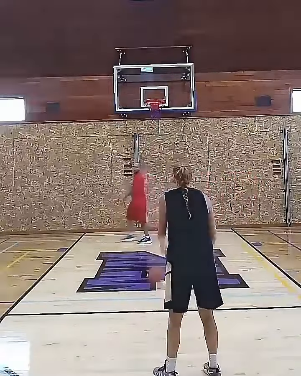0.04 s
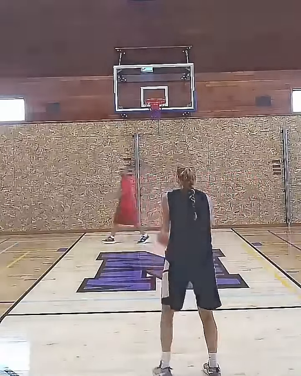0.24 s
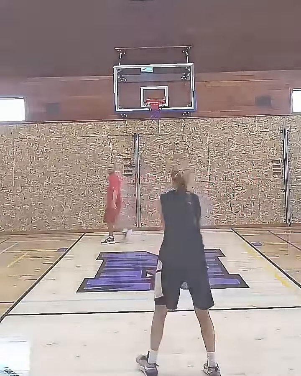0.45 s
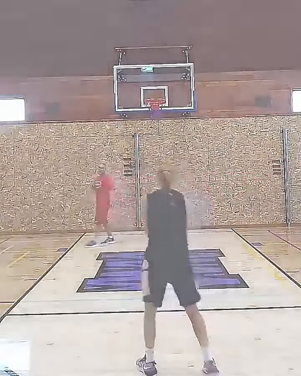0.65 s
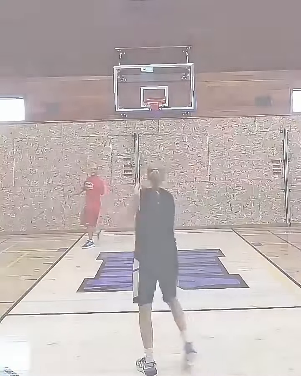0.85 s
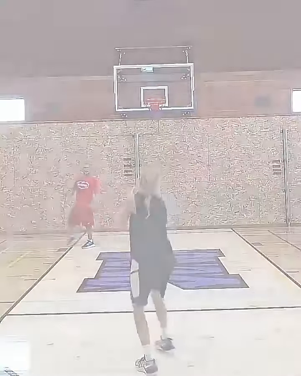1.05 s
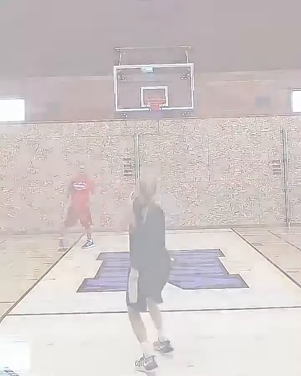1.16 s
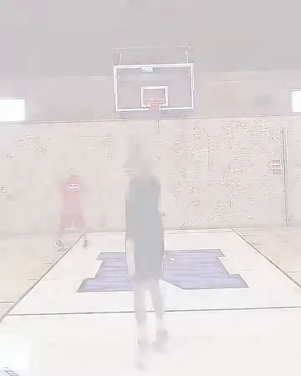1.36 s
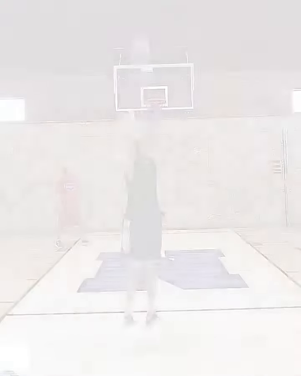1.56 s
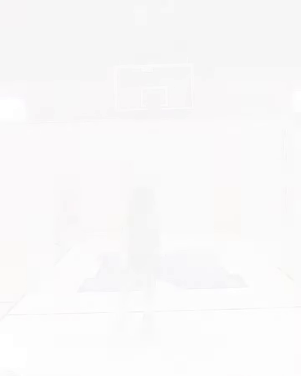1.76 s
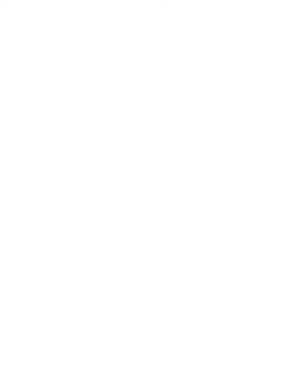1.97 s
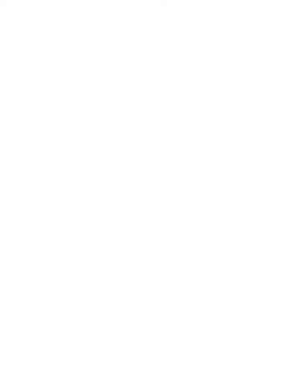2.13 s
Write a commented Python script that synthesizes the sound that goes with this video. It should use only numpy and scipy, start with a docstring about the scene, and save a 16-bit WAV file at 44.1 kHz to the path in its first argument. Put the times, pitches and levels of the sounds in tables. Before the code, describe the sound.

One loud basketball bounce rings out in a big, echoing gym. As it fades, light scuffs and a squeaky step lead to a faint rasp of fingers on the ball, then a sharp two-footed landing on the boards.

```python
"""One bounce and a jump shot in a gym

A basketball slaps and thumps once on the wooden floor of a large gym, and the hall booms on.
Soles scuff, click and squeak as the player steps in and jumps; the ball rasps off the fingers,
both feet land, and the sound cuts off. One microphone hears each impact directly, then from the
hall, over the dying echo of earlier play and a low room noise."""
import sys
import numpy as np
from scipy import signal
from scipy.fft import rfft, irfft
from scipy.io import wavfile
from scipy.ndimage import uniform_filter1d

SR = 44100
rng = np.random.default_rng(int(sys.argv[2]) if len(sys.argv) > 2 else 0)


def digitize_waveform(pressure):
    """Quantize a signal to 16-bit integers and store it at the path in sys.argv[1].

    Rows of a 2-D input are taken as channels; values are limited to [-1, 1].
    """
    field = np.atleast_2d(pressure).T
    bounded = np.clip(field, -1, 1)
    quanta = np.round(bounded * 32767).astype(np.int16)
    wavfile.write(sys.argv[1], SR, quanta)


N = 97020
TIME_S, BIN_HZ = np.arange(N) / SR, np.arange(N // 2 + 1) * SR / N


def undb(db):
    """Decibels to gain."""
    return 10 ** (np.asarray(db) / 20)


def curve(points):
    """Join (Hz, value) points across the spectrum on a log-frequency axis."""
    hz, values = np.array(points, float).T
    return np.interp(np.log(BIN_HZ + 1e-9), np.log(hz), values)


def convolve(x, response):
    """Pass a sound through a response."""
    return signal.fftconvolve(x, response)[:N]


def unit(x):
    """Scale to unit energy."""
    return x / np.sqrt(np.sum(x ** 2))


def delay(x, seconds):
    """The same sound, later."""
    return np.concatenate([np.zeros(int(seconds * SR)), x])[:N]


def soften(x, edge_hz):
    """Roll off the treble."""
    return signal.sosfilt(signal.butter(2, edge_hz, fs=SR, output="sos"), x)


def click(spectrum):
    """A sharp minimum-phase pulse with the given spectrum and a peak of 1."""
    cepstrum = irfft(np.log(undb(curve(spectrum))), N)
    cepstrum[1:N // 2] *= 2
    cepstrum[N // 2 + 1:] = 0
    pulse = irfft(np.exp(rfft(cepstrum)), N)
    return pulse / np.abs(pulse).max()


def noise(spectrum):
    """Coloured noise of rms 1."""
    x = irfft(rfft(rng.standard_normal(N)) * undb(curve(spectrum)), N)
    return x / x.std()


def decay(t60_s):
    """A fade of 60 dB every t60_s seconds."""
    return np.exp(-np.log(1000) * TIME_S / t60_s)


def ring(hz, t60_s, rise_s=1e-6):
    """A damped mode that swells over its rise time."""
    return np.sin(2 * np.pi * hz * TIME_S) * decay(t60_s) * (1 - np.exp(-TIME_S / rise_s))


def swell(start_s, length_s):
    """A short half-sine envelope."""
    return np.sin(np.pi * np.clip((TIME_S - start_s) / length_s, 0, 1))


# How long the gym rings. Each row: frequency in Hz, seconds to fall 60 dB.
HALL_DECAY = [(60, 1.7), (120, 1.4), (250, 1.656), (550, 2.84), (1400, 2.81), (2700, 2.24), (4500, 2.19),
              (8000, 1.4), (15000, 1.2)]

def die_away(x):
    """Each band of a sound fades at the hall's own rate."""
    spectrum, faded = rfft(x), 0
    centres = [hz for hz, _ in HALL_DECAY]
    for share, (_, t60_s) in zip(np.eye(len(centres)), HALL_DECAY):
        band = irfft(spectrum * curve(list(zip(centres, share))), N)
        faded += band * decay(t60_s)
    return faded


# Reverberation gathering at the microphone. Each row: seconds after a hit, relative level in dB.
HALL_BUILD_UP = [(0, -18), (.018, -22), (0.038, -6.5), (0.079, -3), (.2, -1), (.32, 0.5), (.6, 1.5)]

def hall(x):
    """Diffuse reverberation builds up as sound crosses the gym."""
    build_up = undb(np.interp(TIME_S, *np.array(HALL_BUILD_UP).T))
    return convolve(x, unit(die_away(rng.standard_normal(N)) * build_up))


# The gym's room tone, then the echo left in it. Each row: frequency in Hz, relative level in dB.
ROOM_TONE = [(30, -6.5), (120, 0), (400, -7.5), (1500, 3.5), (2800, -21), (4500, -10.5), (5800, -29.5),
             (9000, -42), (12500, -43.5), (15300, -35.5), (16000, -43.5)]
EARLIER_PLAY = [(24, -56), (40, -39.5), (167, -5.5), (256, -6.5), (455, -3), (646, -17), (715, -6.5),
                (965, -27.5), (1180, -7.5), (1680, -19), (3380, -24), (4680, -21.5), (5580, -45),
                (10200, -79.5), (16000, -48)]

def background():
    """The echo of earlier play fades over steady room noise, all around the microphone."""
    return undb(-46) * die_away(noise(EARLIER_PLAY)) + undb(-53) * noise(ROOM_TONE)


def hoot():
    """A faint low tone swells and fades just before the landing."""
    return undb(-48.5) * swell(start_s=1.83, length_s=0.041) * np.sin(2 * np.pi * 336 * TIME_S)


# A sole sliding on wood. Each row: frequency in Hz, relative level in dB.
SCUFF_SPECTRUM = [(200, -40), (1500, -11), (3000, 3.5), (4800, 11.5), (5800, -13.5), (7200, -22.5),
                  (8500, -12), (10000, -24.5), (13000, -35), (15300, -18)]
# The slides. Each row: start in seconds, length in seconds, level in dB.
SOLE_SLIDES = [(0.631, 0.035, -46), (0.65, 0.12, -53), (1.308, 0.045, -50.5), (1.466, 0.062, -55.5)]

def scuffs():
    """Soles slide lightly over the boards as the player shifts weight."""
    envelope = sum(undb(db) * swell(start, length) for start, length, db in SOLE_SLIDES)
    direct = noise(SCUFF_SPECTRUM) * envelope
    return direct + undb(2.5) * hall(direct)


# Rubber soles catching on the court. Each row: start in seconds, pitch in Hz, level in dB.
SOLE_SQUEAKS = [(1.2450, 4200, -31), (1.2905, 4300, -35)]

def squeaks():
    """Rubber sticks and slips for a few milliseconds at an unsteady pitch."""
    direct = 0
    for start, hz, db in SOLE_SQUEAKS:
        waver = uniform_filter1d(rng.standard_normal(N), size=16)
        pitch_hz = hz * (1 + .08 * waver / waver.std())
        phase = 2 * np.pi * np.cumsum(pitch_hz) / SR
        direct += undb(db) * swell(start, length_s=.0045) * np.sin(phase)
    return direct + undb(-6) * hall(direct)


# Air modes in the ball. Each row: frequency in Hz, level in dB, seconds to fall 60 dB.
AIR_MODES = [(917, -57, 0.24), (1147, -41.5, .12), (1441, -51.5, 0.42), (1790, -47, 0.079),
             (1870, -53.5, .1), (2500, -60, 0.08)]

def ball_air():
    """The air inside the ball rings when the skin is struck."""
    return sum(undb(db) * ring(hz, t60_s) for hz, db, t60_s in AIR_MODES)


# Fingers on the ball's skin. Each row: frequency in Hz, relative level in dB.
RASP_SPECTRUM = [(200, -35), (900, -56), (1450, -2.5), (2000, 3.5), (2800, -8.5), (4000, 3), (4800, -4.5),
                 (5800, -29), (8300, -18), (12500, -43), (15200, -21), (16000, -35)]
# The touches. Each row: start in seconds, level in dB.
FINGER_TOUCHES = [(1.6183, -38), (1.6215, -32), (1.6255, -42), (1.646, -44)]

def fingers():
    """Fingers rasp over the pebbled skin as the shot leaves the hands; the ball rings faintly."""
    envelope = sum(undb(db) * swell(start, length_s=.0035) for start, db in FINGER_TOUCHES)
    rasp = noise(RASP_SPECTRUM) * envelope
    direct = rasp + undb(-12) * convolve(rasp, unit(ball_air()))
    return direct + undb(-2.5) * hall(direct)


# The sprung floor around an impact. Each row: frequency in Hz, relative level in dB.
FLOOR_SPECTRUM = [(30, -27.5), (60, -14), (100, -1.5), (140, 4), (230, 0), (370, -9), (600, -13.5),
                  (1300, -18), (3000, -25.5), (5000, -33.5), (6000, -43.5), (16000, -69)]

def floor_rumble(rise_s=0.045):
    """The boards shake on for a moment after an impact."""
    return noise(FLOOR_SPECTRUM) * (1 - np.exp(-TIME_S / rise_s)) * decay(t60_s=0.36)


# A sole striking wood. Each row: frequency in Hz, relative level in dB.
SOLE_SPECTRUM = [(60, 7), (300, 5), (900, -2), (2000, -1), (3000, -8.5), (4300, -1.5), (5100, -1),
                 (5800, -16), (6400, -12), (7300, -33), (8500, -19.5), (11000, -35), (16000, -52)]
# Shoes on the court; the last two are the landing. Each row: start in seconds, click level in dB,
# its treble edge in Hz, thud level in dB, thud pitch in Hz, rumble level in dB.
FOOTFALLS = [(1.2458, -17.5, 11100, -24, 174, -35), (1.2860, -50, 3000, -32.5, 158, -40.5),
             (1.471, -31, 5000, -52, 160, -43), (1.8900, -14.5, 15000, -22.5, 160, -33.5),
             (1.897, -12.5, 2740, -21, 307, -24)]
# Loose boards and laces after the landing. Each row: start in seconds, level in dB.
LANDING_TICKS = [(1.9132, -37), (1.9245, -31), (1.9345, -39), (1.9447, -31.5)]

def steps():
    """Each sole clicks on the boards, which thud and rumble; small ticks follow the landing."""
    sole, boards = click(SOLE_SPECTRUM), 0
    direct = sum(undb(db) * delay(sole, start) for start, db in LANDING_TICKS)
    for start, click_db, edge_hz, thud_db, thud_hz, rumble_db in FOOTFALLS:
        tap = undb(click_db) * soften(sole, edge_hz)
        thud = undb(thud_db) * ring(thud_hz, t60_s=0.03, rise_s=0.00033)
        direct += delay(tap - thud, start)
        boards += delay(undb(rumble_db) * floor_rumble(), start)
    return direct + boards + undb(-4) * hall(direct)


# The skin's slap at the microphone, then what ball and floor send out into the hall.
# Each row: frequency in Hz, relative level in dB.
SLAP_SPECTRUM = [(60, -13.5), (300, -5), (780, -16), (1500, 7), (1800, 3.5), (2300, -13.5), (2900, -21.5),
                 (3800, -7), (4400, -2), (5000, -11), (5600, -42.5), (16000, -59)]
BOOM_SPECTRUM = [(25, -34), (45, -21), (75, -8.5), (108, 2), (147, -5), (190, -3), (255, 1), (372, -14.5),
                 (542, -11), (790, -17), (1020, -16.5), (1700, -12), (2150, -19), (2550, -20.5),
                 (3220, -25), (4460, -25), (5150, -29), (5720, -51.5), (6400, -43.5), (7200, -59),
                 (8300, -52), (12000, -77.5), (16000, -75)]
# Slap and thump coming back from the distant walls and roof. Each row: delay in seconds, gain in dB.
SLAP_REFLECTIONS = [(.0277, -15), (.0422, -10), (.0505, -12), (.0553, -8), (.063, -13), (.0782, -14)]
THUMP_REFLECTIONS = [(0.0271, -11), (0.074, -15), (.0845, -13.5), (0.12, -7)]

def bounce(start_s=0.2155):
    """The skin slaps, ball and floor thump, the air inside rings; walls echo and the hall booms."""
    slap = undb(-8) * click(SLAP_SPECTRUM) + undb(-5.5) * ring(hz=1550, t60_s=0.002)
    thump = -undb(1.5) * delay(ring(hz=178, t60_s=0.028, rise_s=0.0035), seconds=0.0024)
    air = ball_air()
    dull_slap = soften(slap, edge_hz=4900)
    echoes = sum(undb(db) * delay(dull_slap, lag) for lag, db in SLAP_REFLECTIONS)
    echoes += sum(undb(db) * delay(thump, lag) for lag, db in THUMP_REFLECTIONS)
    boom = undb(17) * hall(unit(click(BOOM_SPECTRUM)) + air)
    boards = undb(-26.5) * floor_rumble()
    return delay(slap + thump + air + boards + echoes + boom, start_s)


def scene():
    """Ball, player and gym at one microphone."""
    return (bounce() + steps() + squeaks() + scuffs() + fingers() + hoot() + background())[None]


CEILING, CUT_S, CUT_FADE_S, TOP_HZ = .52, 1.9485, 0.0034, 16000

def record(dry):
    """The recorder clips the slap, stops abruptly after the landing and cuts the highest treble."""
    clipped = np.clip(dry, -CEILING, CEILING)
    running = np.clip((CUT_S - TIME_S) / CUT_FADE_S + .5, 0, 1)
    lowpass = signal.ellip(8, .2, 70, TOP_HZ, fs=SR, output="sos")
    return signal.sosfilt(lowpass, clipped * running)


dry = scene()
out = record(dry)
digitize_waveform(out)
```